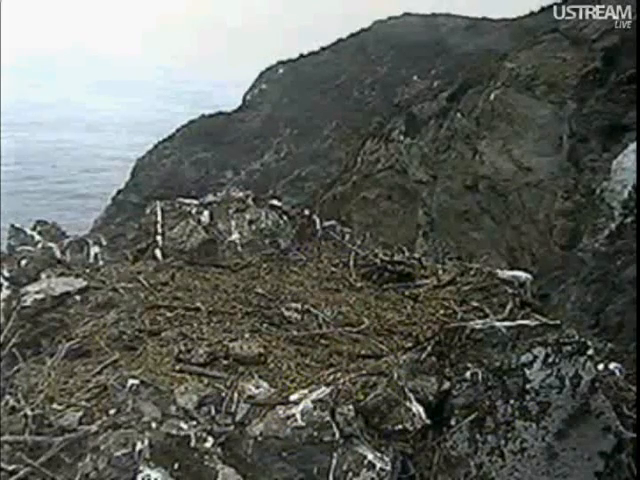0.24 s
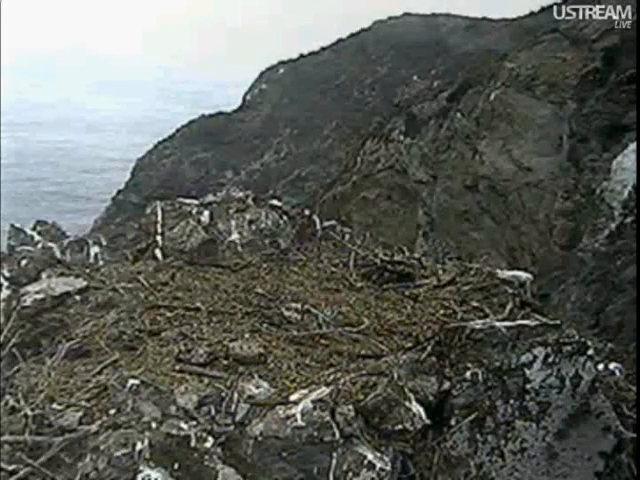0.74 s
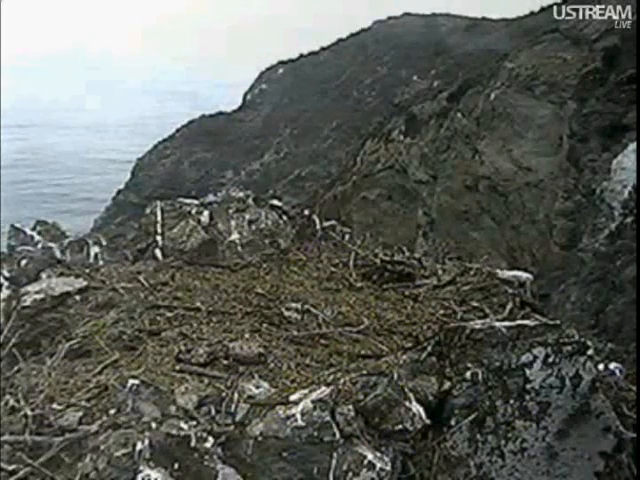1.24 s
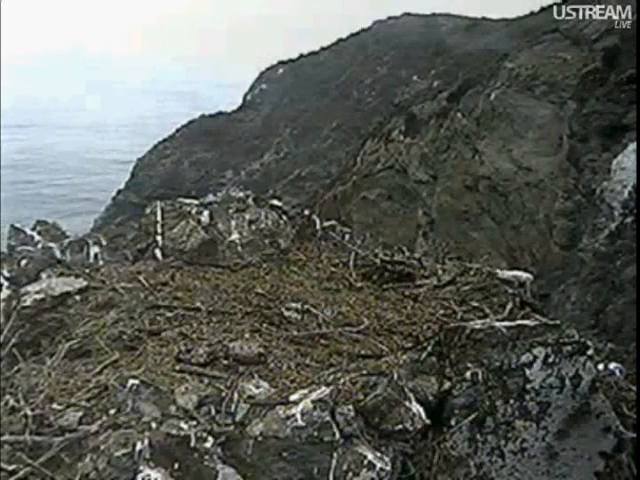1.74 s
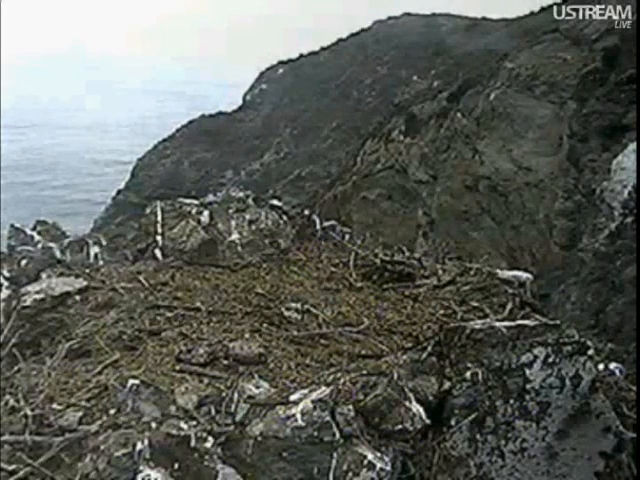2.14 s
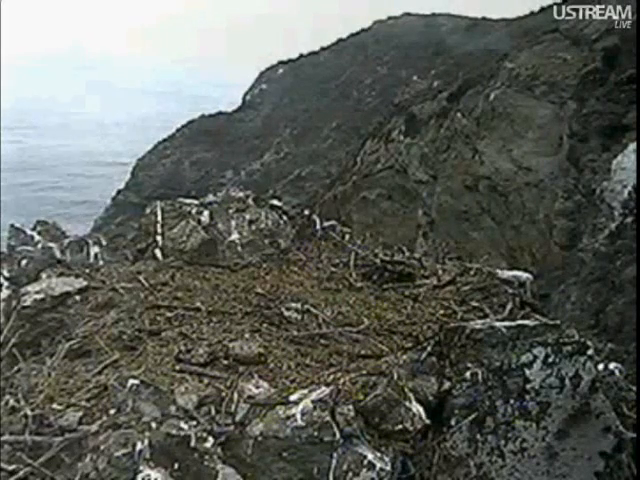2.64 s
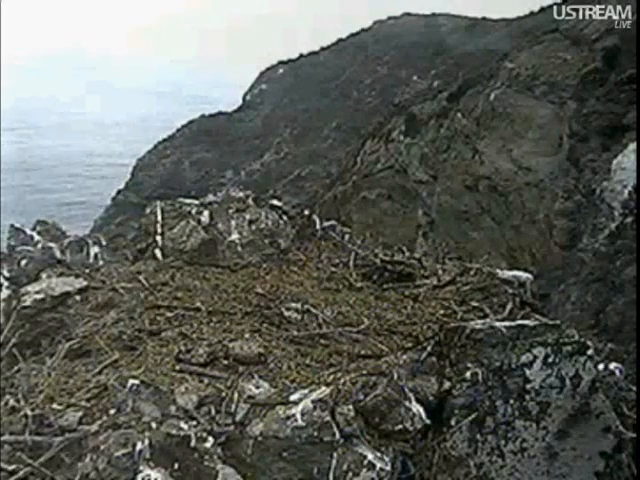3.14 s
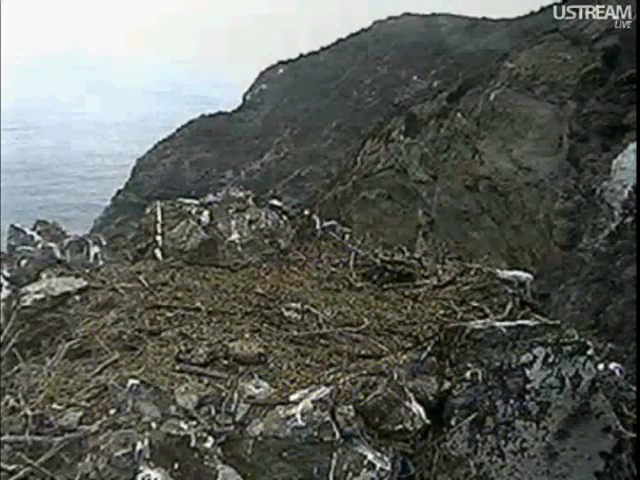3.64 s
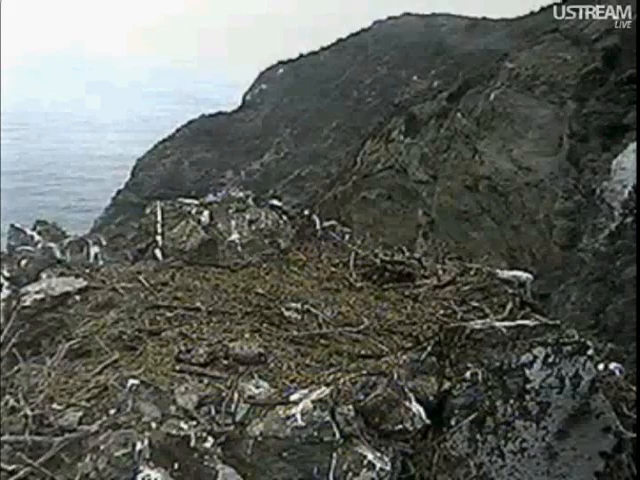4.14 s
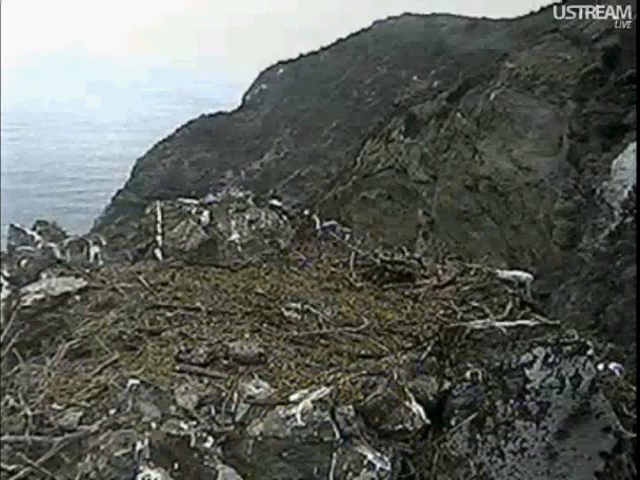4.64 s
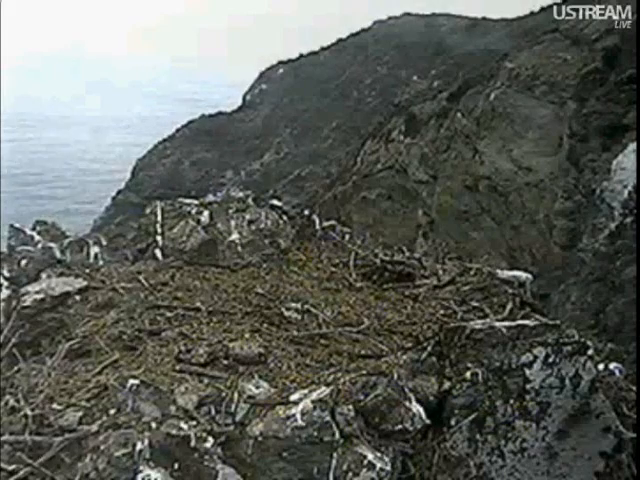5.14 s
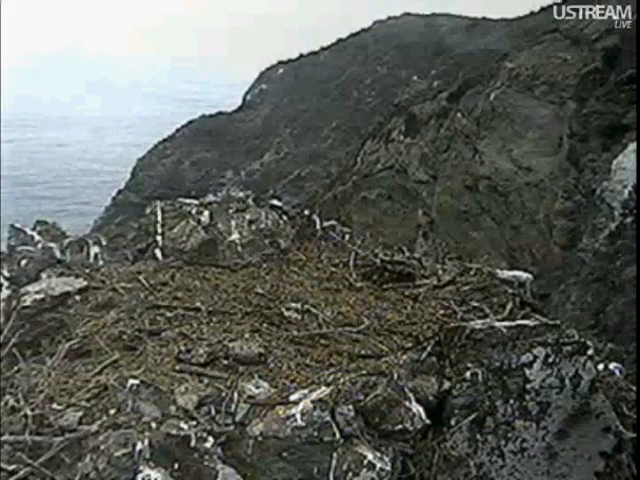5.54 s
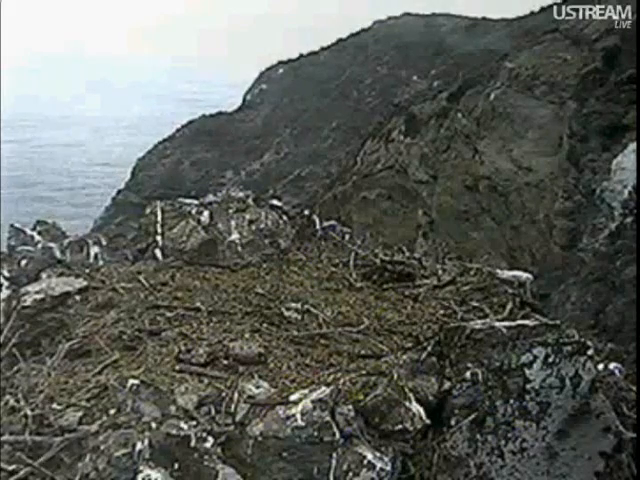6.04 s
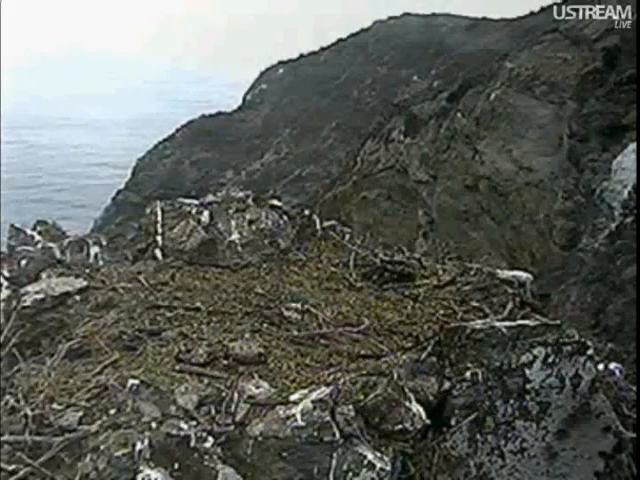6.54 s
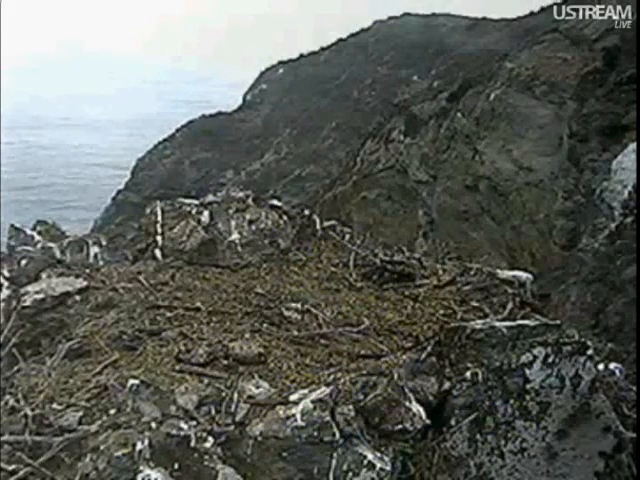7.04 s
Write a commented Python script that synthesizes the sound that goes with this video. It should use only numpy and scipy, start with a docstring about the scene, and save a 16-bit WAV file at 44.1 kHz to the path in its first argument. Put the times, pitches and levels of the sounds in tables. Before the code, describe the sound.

A steady hiss of sea and air runs throughout, with a very faint electrical hum, heard through a coarse-sounding fixed microphone on a sea cliff. In the first second eagles give sharp, high pips and short hoarse yelps. At about 1.2 seconds comes a rapid, raspy chitter ending in two louder pips, then a softer phrase from 2 to 2.5 seconds. A lull follows, with only a few faint chirps and a cluck. From 4.4 to 5.3 seconds another chittering run with thin squeaks sinks slightly in pitch and ends on a pip. The loudest, busiest burst starts at about 6 seconds: chitter mixed with squeals, tumbling into short clucks, with strong pips near 6.7 and 7 seconds and more chitter until about 7.3 seconds. The calls echo briefly off the surrounding rock.

```python
"""Sharp pips and hoarse yelps open an exchange between eagles around a nest on a sea cliff.
Phrases of raspy two-voiced chitter sink and end in pips, among squeals, swoops, squeaks and clucks.
Airflow makes the syrinx oscillate for the tones; its slapping membranes ring the throat for the rasps.
The rock scatters the calls back over a steady hiss of sea and air, and a fixed microphone
passes it all, with mains hum, to a coarse low-rate converter."""
import sys
import numpy as np
from scipy import signal
from scipy.fft import rfft, irfft, next_fast_len
from scipy.io import wavfile
from scipy.ndimage import uniform_filter1d

SR = 44100
rng = np.random.default_rng(int(sys.argv[2]) if len(sys.argv) > 2 else 0)


def materialize(psi):
    """Save the field psi as 16-bit PCM at rate SR to the path in sys.argv[1].

    A 1-D psi becomes a single channel; in a 2-D psi each row is a channel.
    """
    bounded = np.clip(np.atleast_2d(psi).T, -1, 1)
    quanta = np.round(bounded * 32767).astype(np.int16)
    wavfile.write(sys.argv[1], SR, quanta)


N = 321930


def chitters():
    """Biphonation: after a rasp, the two sides of the syrinx sing a high arch and a level voice below."""
    # two-voiced notes; through a phrase the upper voice sinks and the lower takes over:
    # start_s, length_s, upper_hz, upper_db, lower_hz, lower_db, lower_delay_s, rasp_db
    notes = [(1.201, .033, 4130, -30.5, 3380, -40.5, .02, -56),
             (1.301, .049, 4295, -39, 3180, -58, 0, -47.5), (1.43, .035, 4250, -40, 3335, -39, .032, -44.5),
             (2.035, .035, 4000, -55, 3140, -49, -.004, -58),
             (2.135, .033, 4100, -34.7, 3210, -38.5, -.007, -53),
             (2.243, .035, 4090, -34.5, 3160, -46, 0, -53), (2.349, .022, 3975, -39, 3200, -56, 0, -51),
             (4.429, .054, 4150, -33.5, 3190, -60, 0, -57), (4.559, .032, 4370, -40, 3135, -40, .05, -56),
             (4.674, .042, 4190, -34.5, 3270, -43.5, -.005, -53),
             (4.81, .033, 4090, -32, 3140, -44, -.008, -52),
             (4.944, .044, 4070, -38.5, 3220, -33.5, -.007, -45.5),
             (5.083, .032, 3880, -42, 3150, -35, -.003, -54),
             (6.067, .058, 4220, -42, 3100, -55, -.01, -56),
             (6.177, .043, 4470, -32.3, 3210, -54, 0, -46.5),
             (6.287, .031, 4445, -30.5, 3170, -34.5, .008, -42.5),
             (6.378, .032, 4380, -33.5, 3290, -52, 0, -42), (6.481, .026, 4265, -35, 3335, -35, .03, -41),
             (6.599, .02, 4130, -33.5, 3245, -33, -.016, -50), (7.032, .02, 4145, -38, 3400, -43, 0, -56),
             (7.136, .028, 4160, -34, 3300, -35, .027, -43.5),
             (7.258, .027, 4120, -35, 3380, -36.5, -.006, -50)]
    bend_hz_per_s2, top_share = 340000, .47
    for start_s, length_s, upper_hz, upper_db, lower_hz, lower_db, lower_delay_s, rasp_db in notes:
        yield start_s - .01, rasp(.025, rasp_db), 0
        from_top_s = length_s * (np.array([0, .5, 1]) - top_share)
        arch_hz = upper_hz - bend_hz_per_s2 * from_top_s ** 2
        upper = whistle(length_s, arch_hz, upper_db, octave_db=-40, jitter=.014, flutter_db=4)
        # directivity: loud notes are aimed at the microphone and return less echo
        yield start_s, upper, np.interp(upper_db, [-37, -31], [4.5, -3])
        lower = whistle(length_s * .72, [lower_hz] * 3, lower_db, octave_db=-29, jitter=.018)
        yield start_s + lower_delay_s, lower, 1


def pips():
    """Vocal effort shapes the tone: a forced pip scoops upward and has a stronger second harmonic."""
    # single notes of the lower voice: start_s, length_s, pitch_hz, level_db, echo_db
    notes = [(0.0, .032, 3105, -38, 7), (.333, .029, 3096, -32.5, -4), (.772, .017, 3135, -35.5, -4),
             (1.136, .023, 3090, -34.5, -4), (1.551, .044, 3440, -28, 0), (1.658, .024, 3346, -25.5, .5),
             (2.452, .033, 3110, -40.5, 8.5), (3.552, .028, 3170, -49, 1), (4.765, .02, 3175, -32.5, -8),
             (5.214, .036, 3048, -28.3, 3), (6.676, .036, 3330, -22, -2), (7.003, .026, 3385, -19, -2.5),
             (7.285, .016, 3180, -33, 1)]
    for start_s, length_s, pitch_hz, level_db, echo_db in notes:
        effort = np.interp(level_db, [-28, -20], [0, 1])
        arch_hz = pitch_hz * np.array([1.005 - .075 * effort, 1, .985 + .04 * effort])
        yield start_s, whistle(length_s, arch_hz, level_db, octave_db=-32 + 7 * effort), echo_db


def yelps(low_hz=2500, high_hz=2950, length_s=.021, echo_db=-7):
    """A register break: over a long rasp, a low rising note jumps to a higher one."""
    # hoarse yelps: start_s, level_db, rasp_length_s
    notes = [(.255, -32, .14), (.697, -36.5, .105), (1.105, -33.5, .045)]
    low_arch_hz = low_hz * np.array([.96, 1, 1.02])
    high_arch_hz = high_hz * np.array([1.08, 1, 1.02])
    for start_s, level_db, rasp_length_s in notes:
        yield start_s - .014, rasp(rasp_length_s, level_db=-46), -2
        yield start_s, whistle(length_s, low_arch_hz, level_db, octave_db=-20, jitter=.025), echo_db
        high = whistle(length_s, high_arch_hz, level_db - 3.5, octave_db=-29, jitter=.02)
        yield start_s + .01, high, echo_db


def squeals(bend_hz_per_s2=85000, echo_db=-6.5):
    """A parabolic glide: pitch falls from its top with time squared, so long squeals arch the most."""
    # steady squeals, most with a strong octave: start_s, length_s, top_hz, level_db, octave_db
    notes = [(4.62, .022, 2550, -49, -23), (4.77, .023, 2555, -46, -23), (6.228, .054, 2595, -31.5, -5),
             (6.31, .06, 2661, -28, -3.5), (6.368, .013, 2550, -31.5, -15), (6.392, .067, 2667, -28.5, -1),
             (6.497, .037, 2610, -35.5, 14), (6.529, .013, 2575, -26, -12), (6.597, .041, 2566, -22, -7.5)]
    for start_s, length_s, top_hz, level_db, octave_db in notes:
        ends_hz = top_hz - bend_hz_per_s2 * (length_s / 2) ** 2
        yield start_s, whistle(length_s, [ends_hz, top_hz, ends_hz], level_db, octave_db), echo_db


def swoops(echo_db=-10):
    """Fast random modulation of pitch and amplitude roughens a whistle that dips and climbs again."""
    # soft swoops: start_s, length_s, dip_hz, level_db
    notes = [(1.355, .06, 2950, -41.5), (2.257, .056, 2760, -43.5), (2.73, .04, 2850, -52),
             (3.643, .042, 2780, -47), (4.167, .05, 2850, -50), (6.075, .059, 2920, -48)]
    for start_s, length_s, dip_hz, level_db in notes:
        arch_hz = dip_hz * np.array([1.19, 1, 1.24])
        swoop = whistle(length_s, arch_hz, level_db, octave_db=-25, jitter=.035, flutter_db=6)
        yield start_s, swoop, echo_db


def squeaks(from_hz=5800, drop_s=.012):
    """A linear frequency sweep drops a thin, nearly pure tone onto a held pitch."""
    # high squeaks: start_s, held_s, held_hz, level_db, echo_db
    notes = [(1.293, .007, 5380, -42, -8), (3.643, .004, 5400, -48, -4), (4.543, .048, 5115, -41.5, 1.5),
             (4.667, .04, 5150, -50, 5.5), (6.165, .032, 5280, -46.5, 3)]
    for start_s, held_s, held_hz, level_db, echo_db in notes:
        sweep_hz = np.linspace(from_hz, held_hz, 3)
        yield start_s, whistle(drop_s, sweep_hz, level_db, octave_db=-40, jitter=.03), echo_db
        yield start_s + drop_s, whistle(held_s, [held_hz] * 3, level_db, octave_db=-40), echo_db


def clucks(resonance_hz=3000, slope_db_per_hz=.016, echo_db=-5):
    """Resonance: the octave of a short falling note is strongest near the throat's own frequency."""
    # low clucks: start_s, length_s, pitch_hz, level_db
    notes = [(1.19, .009, 1290, -42.5), (2.024, .028, 1430, -49.5), (2.942, .025, 1195, -44),
             (6.055, .02, 1442, -48), (6.704, .026, 2495, -27), (6.729, .012, 1930, -33.5),
             (6.812, .023, 1868, -31), (6.931, .011, 1545, -35.5)]
    # the voice cracks as a loud call tumbles into clucks: start_s, length_s, level_db
    cracks = [(6.706, .008, -26.5), (6.729, .008, -36)]
    for start_s, length_s, pitch_hz, level_db in notes:
        octave_db = max(-slope_db_per_hz * abs(2 * pitch_hz - resonance_hz), -16)
        fall_hz = pitch_hz * np.array([1.02, 1, .98])
        yield start_s, whistle(length_s, fall_hz, level_db, octave_db), echo_db
    for start_s, length_s, level_db in cracks:
        yield start_s, rasp(length_s, level_db), 0


def whistle(length_s, arch_hz, level_db, octave_db, jitter=.009, flutter_db=3.24):
    """Self-sustained oscillation of the syrinx glides through a start, a middle and an end pitch."""
    progress = np.linspace(0, 1, int(length_s * SR))
    pitch_hz = np.polyval(np.polyfit([0, .5, 1], arch_hz, 2), progress)
    strain = np.interp(arch_hz[1], [2750, 3200], [.35, 1])  # high notes shake more than low ones
    shaky_hz = pitch_hz * (1 + strain * jitter * wander(len(progress), 350))
    phase = 2 * np.pi * np.cumsum(shaky_hz) / SR
    # the third harmonic sounds only near an upper throat resonance at 5600 Hz
    third_gain = gain_of(-1) * np.exp(-((3 * pitch_hz - 5600) / 500) ** 2)
    tone = np.sin(phase) + gain_of(octave_db) * (np.sin(2 * phase) + third_gain * np.sin(3 * phase))
    attack = np.sin(np.pi / 2 * np.minimum(progress / .2, 1))
    release = np.sin(np.pi / 2 * np.minimum((1 - progress) / .28, 1))
    flutter = gain_of(strain * flutter_db * wander(len(progress), 130))
    return gain_of(level_db) * np.sqrt(2) * unit_rms(attack * release * flutter) * tone


def rasp(length_s, level_db, pulse_hz=330, unevenness=.27, air=.042):
    """Source and filter: uneven membrane slaps and a little rushing air excite the throat's formants."""
    # throat resonances: centre_hz, width_hz, relative_db
    formants = [(2595, 250, -7.5), (3160, 880, 2.5), (3370, 210, 2), (5100, 700, -11)]
    size = int(length_s * SR)
    cycles = np.cumsum(pulse_hz * np.exp(unevenness * wander(size, 200))) / SR
    slaps = np.diff(np.floor(cycles), prepend=0) * rng.uniform(.32, 1, size)
    drive = slaps + air * rng.standard_normal(size)
    sound = np.zeros(size)
    for centre_hz, width_hz, relative_db in formants:
        b, a = signal.iirpeak(centre_hz, centre_hz / width_hz, SR)
        sound += gain_of(relative_db) * signal.lfilter(b, a, signal.lfilter(b, a, drive))
    return gain_of(level_db) * unit_rms(sound * signal.windows.tukey(size, .4))


def eagles():
    """Superposition: calls add on the direct path and, scaled by echo_db, on the path out to the rock."""
    direct, outward = np.zeros((2, N))
    for calls in (chitters, pips, yelps, squeals, swoops, squeaks, clucks):
        for start_s, sound, echo_db in calls():
            add(direct, start_s, sound)
            add(outward, start_s, gain_of(echo_db) * sound)
    return direct, outward


def rock_echoes(outward, delay_s, t60_s, gain_db, echoes_per_s=2000):
    """Diffuse reflection: rough rock returns a dying cloud of echoes that shifts as the birds turn."""
    lag_s = np.arange(SR) / SR
    envelope = np.clip((lag_s - delay_s) / .0027, 0, 1) * gain_of(-60 * lag_s / t60_s)
    echoes = np.zeros(N)
    for direction in range(3):  # three clouds cross-fade in a regular cycle
        taps = rng.choice([-1., 1.], SR) * (rng.random(SR) < echoes_per_s / SR) * envelope
        facing = np.sqrt(2 / 3) * np.cos(np.pi * (np.arange(N) / SR * 2 + direction / 3))
        echoes += signal.fftconvolve(outward * facing, taps / np.linalg.norm(taps))[:N]
    return gain_of(gain_db) * echoes


def hiss(level_db=-42.5, patchy_db=1.03):
    """Spectrally shaped noise of sea and air, with a hollow peak, drifting patches and a slight swell."""
    # noise spectrum: frequency_hz, relative_db
    spectrum = [(20, -13.5), (70, -16), (140, -22.5), (250, -18.5), (480, -12), (700, -10.5), (900, -4.5),
                (1110, 1), (1400, -14), (2050, -19.5), (2800, -19.5), (3120, -13), (3550, -22.5),
                (7400, -25.5)]
    # slow swell: time_s, relative_db
    swell_points = [(0, -44), (1.7, -44.6), (2.8, -43.6), (4, -45.1), (4.8, -43.8), (6.7, -42.6),
                    (7.3, -43.2)]
    frames, bins_hz = N // 512 + 5, np.fft.rfftfreq(2048, 1 / SR)
    real, imaginary, patches = rng.standard_normal((3, frames, len(bins_hz)))
    patches = uniform_filter1d(patches, size=8, axis=0)
    patches = unit_rms(uniform_filter1d(patches, size=12, axis=1))
    frequency_hz, relative_db = np.transpose(spectrum)
    shape_db = np.interp(np.log(bins_hz + 1), np.log(frequency_hz), relative_db)
    spectra = (real + 1j * imaginary) * gain_of(shape_db + patchy_db * patches)
    noise = signal.istft(spectra.T, nperseg=2048, noverlap=1536)[1][:N]
    swell = gain_of(np.interp(np.arange(N) / SR, *np.transpose(swell_points)))
    return gain_of(level_db) * unit_rms(noise * swell)


def hum(mains_hz=60):
    """Electrical coupling leaks mains harmonics into the microphone line."""
    # hum partials: harmonic_number, level_db
    partials = [(1, -71), (3, -74), (4, -75.5), (5, -76), (7, -74)]
    cycles = mains_hz * np.arange(N) / SR
    return sum(gain_of(level_db) * np.sqrt(2) * np.sin(2 * np.pi * (harmonic * cycles + rng.random()))
               for harmonic, level_db in partials)


def gain_of(db):
    """Amplitude ratio of a level in decibels."""
    return 10 ** (np.asarray(db) / 20)


def unit_rms(x):
    """Normalisation to an rms of 1."""
    return x / np.sqrt(np.mean(x ** 2) + 1e-20)


def add(mix, start_s, sound):
    """Superposes a sound on the mix from start_s."""
    part = mix[max(round(start_s * SR), 0):][:len(sound)]
    part += sound[:len(part)]


def wander(size, cutoff_hz):
    """Low-pass noise: a smooth random motion with an rms near 1."""
    padded = next_fast_len(size + SR // 10)
    rolloff = np.exp(-(np.fft.rfftfreq(padded, 1 / SR) / cutoff_hz) ** 2)
    return unit_rms(irfft(rfft(rng.standard_normal(padded)) * rolloff))[:size]


def low_pass(x, cutoff_hz):
    """A windowed-sinc filter sets a steep band limit."""
    return signal.oaconvolve(x, signal.firwin(701, cutoff_hz, window=("kaiser", 8), fs=SR), "same")


def scene():
    """Direct sound, early and late reflections and the steady background sum at the microphone."""
    direct, outward = eagles()
    nest_rocks = rock_echoes(outward, delay_s=.012, t60_s=.18, gain_db=-7.5)
    far_cliff = rock_echoes(outward, delay_s=.09, t60_s=.66, gain_db=-13.5)
    return (direct + nest_rocks + far_cliff + hiss() + hum())[None]


def record(dry, input_band_hz=7480, output_band_hz=15800, noise_db=-69, dc_offset=.0542, click_s=6.604):
    """Spectral imaging: a noisy half-rate converter holds each sample, mirroring the treble upward."""
    line = low_pass(dry[0], input_band_hz) + gain_of(noise_db) * rng.standard_normal(N)
    samples = line[::2].copy()
    samples[round(click_s * SR / 2)] += gain_of(-21)  # one sharp click
    held = np.repeat(samples, 2)[:N]
    return (low_pass(held, output_band_hz) + dc_offset)[None]


dry = scene()
out = record(dry)
materialize(out)
```